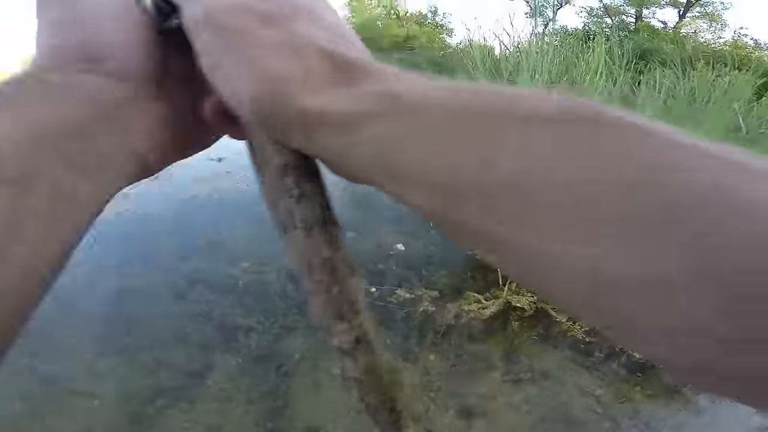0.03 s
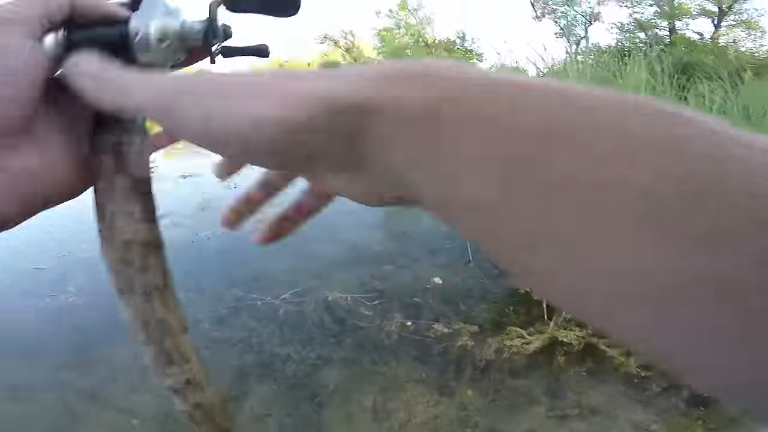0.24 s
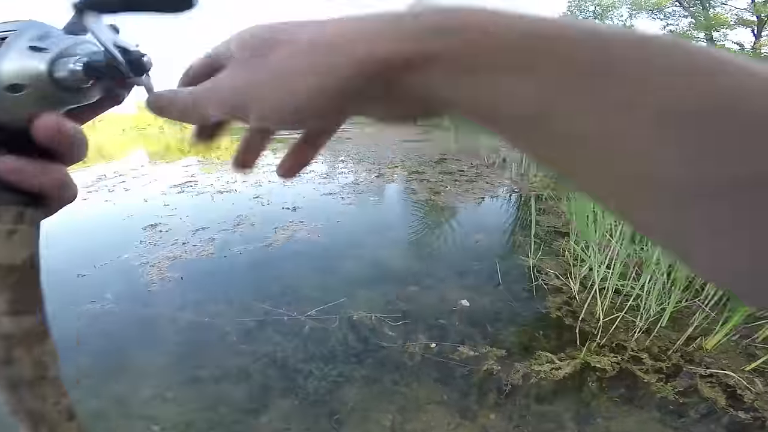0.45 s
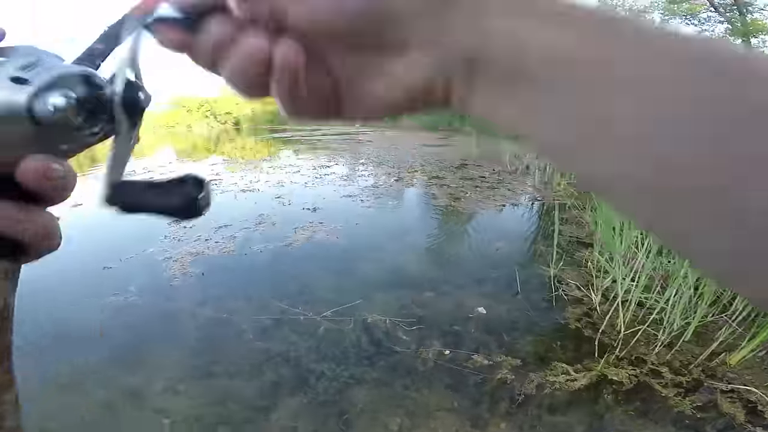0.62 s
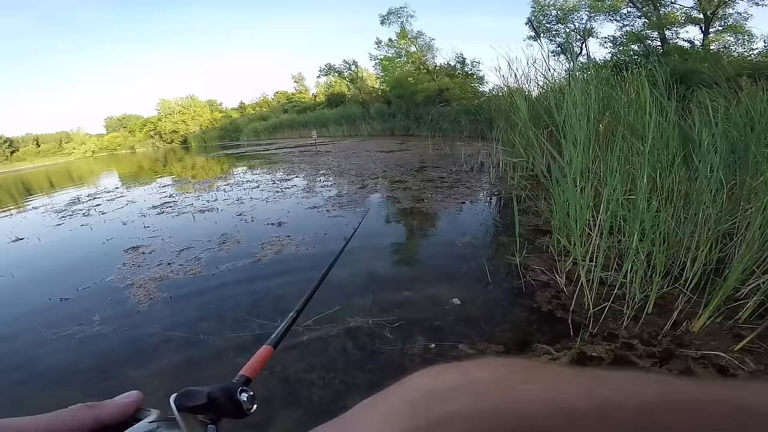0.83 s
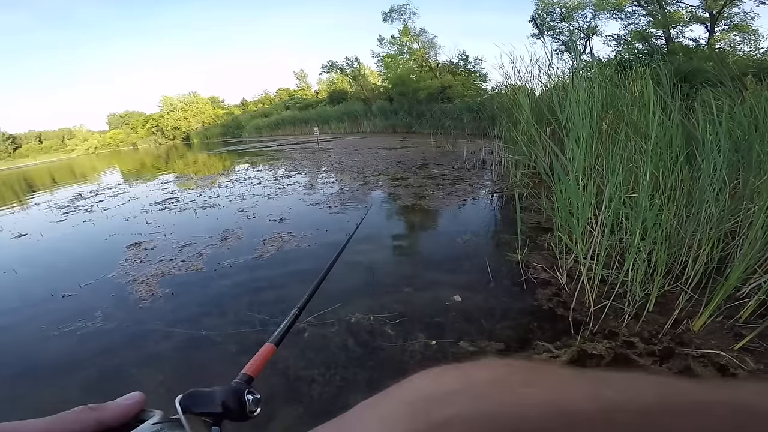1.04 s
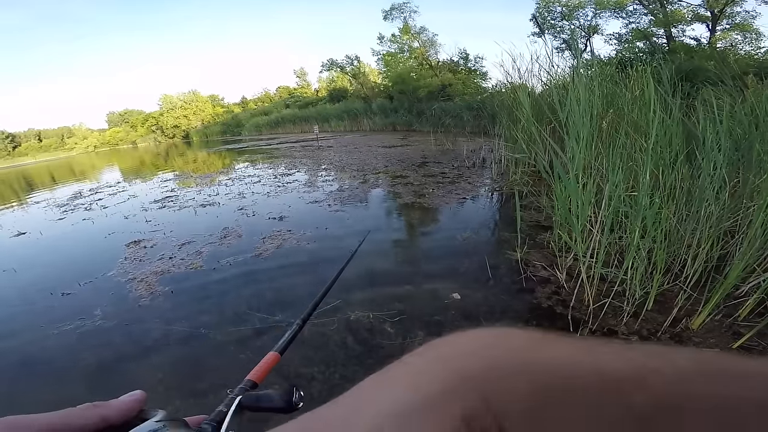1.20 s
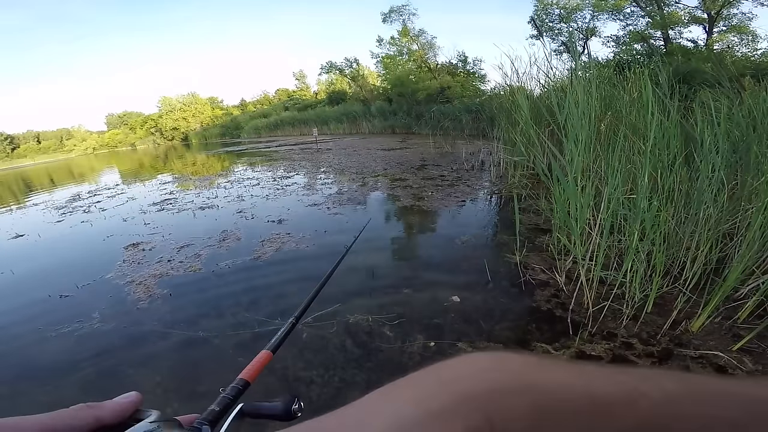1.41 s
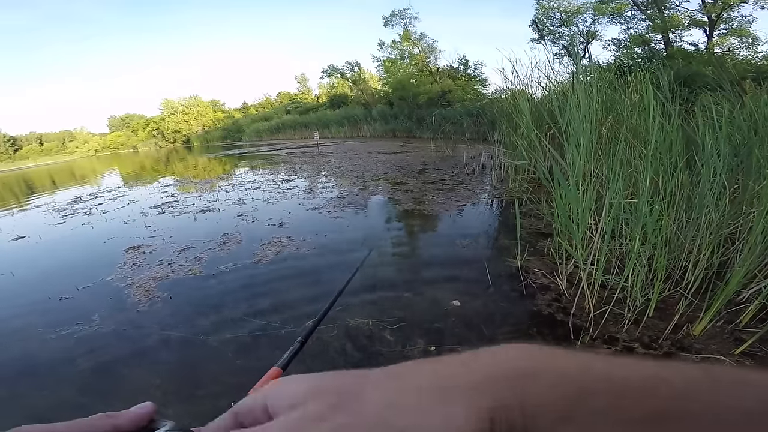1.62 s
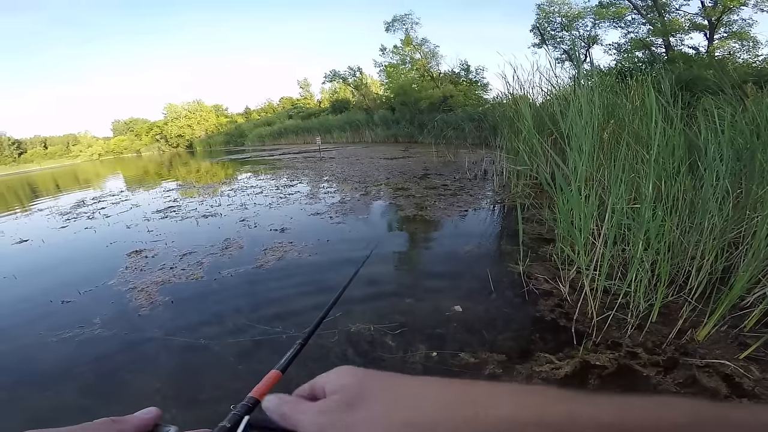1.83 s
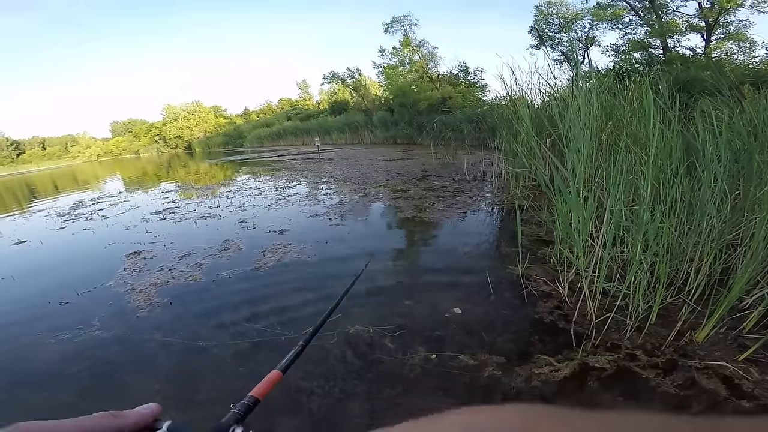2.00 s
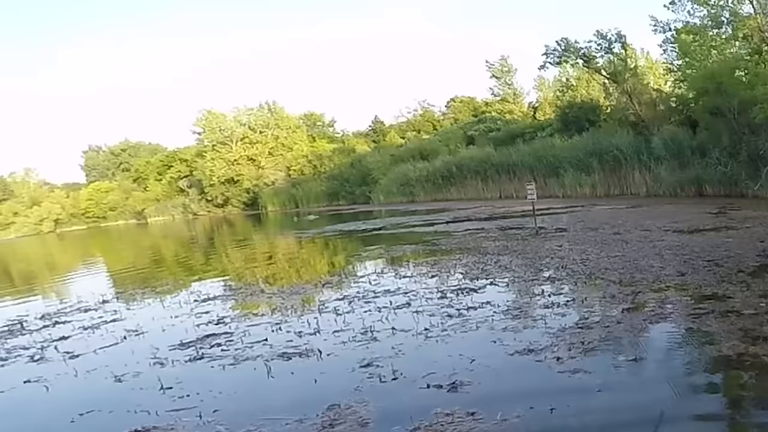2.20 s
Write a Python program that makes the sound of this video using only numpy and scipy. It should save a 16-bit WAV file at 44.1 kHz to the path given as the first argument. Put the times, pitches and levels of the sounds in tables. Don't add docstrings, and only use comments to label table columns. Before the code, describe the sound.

A fishing reel clutch snaps over with a loud metallic clack, then small ticks, beside a quiet pond

```python
import sys
import numpy as np
from scipy import signal
from scipy.fft import rfft, irfft, next_fast_len
from scipy.io import wavfile
from scipy.ndimage import uniform_filter1d, map_coordinates

SR = 44100
rng = np.random.default_rng(int(sys.argv[2]) if len(sys.argv) > 2 else 0)


def voltage_ratio(decibels):
    exponent = np.asarray(decibels, float) / 20
    return 10 ** exponent


def digitize_waveform(pressure):
    field = np.atleast_2d(pressure).T
    bounded = np.clip(field, -1, 1)
    quanta = np.round(bounded * 32767).astype(np.int16)
    wavfile.write(sys.argv[1], SR, quanta)


N = 99269


def unit(x):
    return x / np.sqrt(np.mean(x ** 2) + 1e-20)


def along(points, hz):
    f, v = np.transpose(points)
    return np.interp(np.log(hz + 1), np.log(f + 1), v, left=-120, right=-120)


def curves(rows):
    s, *cols = np.transpose(rows)
    return [np.interp(np.arange(N) / SR, s, c) for c in cols]


def wobble(rate):
    knots = rng.standard_normal(int(N * rate / SR) + 4)
    return map_coordinates(knots, [np.arange(N) * rate / SR])


def filtered(x, response):
    m = next_fast_len(x.shape[-1] + 8192)
    spectrum = rfft(x, m) * response(np.fft.rfftfreq(m, 1 / SR))
    return irfft(spectrum, m)[..., :x.shape[-1]]


def hump(x, centre_hz, width_hz):
    return filtered(x, lambda f: np.exp(-((f - centre_hz) / width_hz) ** 2))


def tone(hz):
    return np.sin(2 * np.pi * np.cumsum(hz) / SR)


def rush(spectrum, patchy_db):
    z = signal.stft(rng.standard_normal(N + 512), nperseg=512)[2]
    field = uniform_filter1d(rng.standard_normal(z.shape), 6, 0)
    field = uniform_filter1d(field, 10, 1)
    x = signal.istft(z * voltage_ratio(patchy_db * unit(field)), nperseg=512)[1][:N]
    return unit(filtered(x, lambda hz: voltage_ratio(along(spectrum, hz))))


def clicks(rows, q, broad):
    rise_share, broad_reach = 0.0437, 2.9
    out, t = np.zeros(N + SR), np.arange(SR // 8) / SR
    noise = rng.standard_normal((len(rows), len(t)))
    for (s, db, hz, t60), grit in zip(rows, noise):

        def body(f):
            ring = 1j * f * hz / q / (hz * hz - f * f + 1j * f * hz / q)
            crack = broad * f / (f + 250) / (1 + 1j * f / (broad_reach * hz)) ** 2
            return crack + ring ** 2

        burst = grit * voltage_ratio(-60 * t / t60) * (1 - np.exp(-t / (rise_share * t60)))
        burst = filtered(burst, body)
        energy = np.sum(burst ** 2) / (t60 * SR / 14)
        out[round(s * SR):][:len(t)] += voltage_ratio(db - 5.0) * burst / np.sqrt(energy)
    return out[:N]


def pings(rows):
    rise_share, rough_rad = .03, .55
    choke, cut = 1.556, 0.47
    out, t = np.zeros(N + SR), np.arange(SR // 8) / SR
    drift = uniform_filter1d(rng.standard_normal((len(rows), len(t))), size=40, axis=1)
    for (s, db, hz, t60), wander in zip(rows, drift):
        shape = voltage_ratio(db - 60 * (t / (cut * t60)) ** choke) * (1 - np.exp(-t / (rise_share * t60)))
        mode = np.sin(2 * np.pi * hz * t + rough_rad * unit(wander))
        out[round(s * SR):][:len(t)] += 1.324 * shape * mode
    return out[:N]


def far_traffic():
    # start_s, level_db
    swells = [(0, -1), (.3, 1), (.6, -0.5), (1, -1), (1.15, 1), (1.5, 1), (1.8, -1), (2.25, 0)]
    # pitch_hz, level_db (per Hz)
    colour = [(11, -26), (18, -8.5), (43, 0), (59, -1), (91, -9), (124, -7), (146, -13.5), (283, -25.5),
              (300, -26), (390, -59.5), (660, -120)]
    drone_db, drone_fade_s = 5, .5
    swell_db, = curves(swells)
    rumble = voltage_ratio(-42.5 + swell_db + .6 * wobble(3)) * rush(colour, patchy_db=0.67)
    drone = hump(rumble, centre_hz=193, width_hz=70)
    fade = np.exp(-(np.arange(N) / SR / drone_fade_s) ** 2)
    return rumble + (voltage_ratio(drone_db) - 1) * fade * drone


def reeds():
    # pitch_hz, level_db (per Hz)
    colour = [(150, -27), (250, -1), (455, -5), (796, -6), (1080, -7.5), (1230, -13.5), (3720, -16.5),
              (4150, -17.5), (6500, -24.5), (8450, -22), (14300, -120)]
    return voltage_ratio(-56 + 0.32 * wobble(3.8)) * rush(colour, patchy_db=.8)


def insect_chorus():
    # pitch_hz, level_db (per Hz)
    colour = [(3820, -8.5), (6500, -10), (8150, 1), (8730, 0), (9630, -16), (10600, -17), (11600, -19),
              (14800, -19.5), (15500, -20)]
    return voltage_ratio(-61 + 0.76 * wobble(7.955)) * rush(colour, patchy_db=1.0)


def crickets():
    # pitch_hz, width_hz, level_db
    singers = [
        (4180, 180, -75.5),
        (5600, 150, -74.5),
    ]
    far = np.zeros(N)
    for hz, width_hz, db in singers:
        far += voltage_ratio(db + wobble(4.7)) * unit(hump(rng.standard_normal(N), hz, width_hz))
    return far


def near_trill():
    # start_s, level_db
    loudness = [(0, -73), (.08, -68), (.14, -70), (.17, -65), (.3, -65.5), (.35, -68), (.5, -72),
                (.85, -69), (.95, -75), (1.1, -88)]
    chirps_per_s, first_s, duty = 40.2, .1615, .75
    level_db, = curves(loudness)
    cycle = (np.arange(N) / SR - first_s) * chirps_per_s % 1
    arch = np.sin(np.pi * np.clip(cycle / duty, 0, 1))
    hz = 8500 + 554 * arch + 90 * wobble(200)
    uneven_db = 3.5 * wobble(120) + 3 * wobble(500)
    return np.sqrt(np.abs(arch)) * tone(hz) * voltage_ratio(level_db + 7 + uneven_db)


def birds():
    # start_s, end_s, pitch_hz, level_db
    calls = [
        (0, .16, 5940, -74),
        (.16, .48, 6810, -74.5),
        (.85, 1.25, 7150, -74),
    ]
    t = np.arange(N) / SR
    out = np.zeros(N)
    for start_s, end_s, hz, db in calls:
        gate = np.clip(np.minimum(t - start_s + .01, end_s - t) / .03, 0, 1)
        out += gate * voltage_ratio(db + 0.5 + 2.7 * wobble(25)) * tone(hz + 12 * wobble(30.23))
    return out


def faint_rustles():
    # start_s, level_db (peak), pitch_hz (centre), t60_s
    rustles = [(0, -58, 12500, .12), (.028, -53, 12500, 0.077), (.147, -44, 3500, .012),
               (.154, -41, 9000, 0.012), (.169, -43, 7000, 0.01), (.19, -53, 13500, .12),
               (.262, -56.5, 12000, .06), (.36, -57, 11900, 0.031), (1.295, -53.5, 3000, 0.0202),
               (1.446, -56, 3020, .015), (1.563, -49, 2700, .02), (1.606, -52, 2600, .03),
               (2.117, -54, 13500, .02), (2.235, -55, 11060, 0.018)]
    return clicks(rustles, q=1.6, broad=0.075)


def clutch_slide():
    # start_s, level_db
    loudness = [(.484, -88.5), (.488, -49), (.502, -55.5), (.505, -33), (.52, -23), (.531, -26.5),
                (.54, -32.5), (.547, -39.5), (.56, -74.5)]
    # pitch_hz, level_db
    colour = [(200, -10.5), (700, -4), (1500, -7), (2500, 7), (5200, 2), (8000, -9), (14500, -14.5),
              (16000, -28.5)]
    slide_db, = curves(loudness)
    rasp = unit(voltage_ratio(1.83 * wobble(600)) * rush(colour, patchy_db=-1.5))
    return (np.arange(N) / SR < loudness[-1][0]) * voltage_ratio(slide_db) * rasp


def clutch_snap():
    # start_s, level_db (peak), pitch_hz (centre), t60_s
    contacts = [(.4875, -28, 3006, 0.0062), (.4932, -26, 9000, 0.006), (.4935, -25, 4800, .018),
                (.5036, -23.5, 5500, .012), (.5065, -15.5, 6000, 0.017), (.5108, -11, 6500, .007),
                (.5153, -7, 10500, .011), (.5186, 2, 10500, .009), (.5207, -6, 8000, .008),
                (.5236, -2, 9500, .008), (.5285, -14.5, 11800, 0.012), (.5385, -25, 6020, .022),
                (.533, -25, 9030, .012), (.5425, -27.5, 4800, 0.02), (.558, -45, 4800, 0.0184),
                (.578, -41, 3000, 0.02), (.59, -46.5, 4500, .015)]
    # start_s, level_db (peak), pitch_hz, t60_s
    modes = [(.5108, -17, 5100, .012), (.5153, -18, 12800, .014), (.5156, -13, 10190, .014),
             (.5156, -17, 5060, .014), (.5186, -6, 14470, .01), (.5187, -9, 12300, .012),
             (.5208, -13, 13350, .012), (.5188, -19, 2350, .02), (.5188, -6, 7520, .013),
             (.5188, -12, 4800, .016), (.5207, -12, 5360, .014), (.5236, -3, 12550, .013),
             (.5236, -4, 11410, .013), (.5237, -9, 10120, .012), (.524, -15, 2990, .012),
             (.5256, -16.5, 798, .018), (.5282, -25, 2020, 0.018), (.5375, -24, 5350, .03),
             (.558, -49, 4900, .025)]
    return clicks(contacts, q=1.2, broad=0.68) + pings(modes)


def hands_rub():
    # start_s, level_db
    loudness = [(.55, -48), (.6, -52), (.65, -53.5), (.72, -51.5), (.76, -53.5), (.88, -54), (.92, -83)]
    # pitch_hz, level_db
    colour = [(200, -25), (500, 6.5), (1500, -4), (2500, -1), (6000, -12), (10000, -19), (14500, -16.5),
              (16000, -28)]
    level_db, = curves(loudness)
    rub = unit(voltage_ratio(1.5 * wobble(200)) * rush(colour, patchy_db=-1))
    return (np.arange(N) / SR > .502) * voltage_ratio(level_db) * rub


def frame():
    # pitch_hz, level_db, t60_s
    modes = [(380, -16, .2), (456.6, -15, .08), (300, -9, .04), (550, 1, .05), (730, 3, .045),
             (1000, -1, .045), (885, -17, .13), (1078, -20, .14), (2200, 0, .045), (4943, 2, .035)]
    start_s, ring_db = .519, -17.5
    thud_hz, thud_db, thud_t60_s = 29, -28.5, 0.17
    out, t = np.zeros(N + SR), np.arange(SR // 2) / SR
    ring = np.zeros(len(t))
    for hz, db, t60 in modes:
        ring += voltage_ratio(db - 60 * t / t60) * np.sin(2 * np.pi * hz * t + rng.uniform(0, 6.4))
    ring *= voltage_ratio(ring_db) * (1 - np.exp(-t / 0.0035))
    thud = voltage_ratio(thud_db - 60 * t / thud_t60_s) * np.sin(2 * np.pi * thud_hz * t)
    out[round(start_s * SR):][:len(t)] += ring + thud
    return out[:N]


def reel_ticks():
    # start_s, level_db (peak), pitch_hz (centre), t60_s
    ticks = [(.646, -42, 3940, 0.0207), (.671, -53, 6000, 0.01866), (.6772, -17, 10100, 0.0058),
             (.6775, -28, 3920, .012), (.683, -39, 3000, 0.014), (.719, -47, 9000, 0.0115),
             (.722, -40, 1500, 0.043), (.7288, -27.5, 4000, 0.012), (.7373, -25.5, 6640, 0.0049),
             (.738, -27, 2190, 0.021), (.7415, -31.5, 3480, 0.021), (.748, -37, 2500, 0.038),
             (.76, -47, 5000, 0.012), (.769, -35, 5000, 0.015), (.792, -38, 10500, .01),
             (.7948, -33.5, 4430, 0.019), (.829, -40, 3670, 0.045), (.836, -44, 5000, 0.015),
             (.8392, -17.5, 11300, 0.0053), (.8392, -27, 4800, 0.0106), (.8675, -33.5, 3300, 0.0099),
             (.889, -41, 6940, 0.011), (.8925, -35, 3000, 0.016), (.935, -43, 2280, 0.011)]
    return clicks(ticks, q=2.34, broad=0.98)


def ticks_knocks_drips():
    # start_s, level_db (peak), pitch_hz, t60_s
    modes = [(.6772, -25, 8920, 0.011), (.6774, -29, 2910, 0.017), (.7286, -29.5, 3510, .015),
             (.7288, -32.5, 820, .015), (.733, -37, 3620, 0.017), (.7372, -31, 5400, .012),
             (.7372, -39, 2220, 0.016), (.7413, -35, 755, .03), (.779, -44, 2110, .03),
             (.786, -42, 1950, 0.049), (.792, -41, 4200, 0.022), (.7955, -35.5, 7880, 0.011),
             (.7955, -37, 2600, .012), (.7957, -36, 4700, .02), (.796, -36, 795, 0.063),
             (.8389, -31, 8910, 0.011), (.8389, -29, 12040, 0.01), (.8673, -41, 1160, 0.013),
             (.868, -39.5, 480, 0.052), (1.1042, -48, 5300, 0.013), (1.1045, -46.5, 1230, 0.018),
             (1.105, -42, 2220, .032), (1.345, -44.5, 738, 0.032), (1.435, -52, 980, 0.029),
             (1.567, -49, 950, 0.043), (1.605, -45.5, 980, 0.03), (1.608, -47.5, 710, .035),
             (1.668, -47, 1030, .04), (1.67, -49.5, 590, 0.027)]
    return pings(modes)


def guide_whistle():
    # start_s, pitch_hz, level_db
    glide = [(1.71, 12000, -84), (1.76, 11810, -83), (1.824, 14040, -81), (1.876, 13190, -83),
             (1.966, 13860, -80), (1.996, 13690, -81), (2.056, 12640, -82), (2.08, 11770, -80),
             (2.106, 10800, -85)]
    hz, level_db = curves(glide)
    t = np.arange(N) / SR
    on = (t > glide[0][0]) & (t < glide[-1][0])
    return on * voltage_ratio(level_db + 4 + 2 * wobble(60)) * tone(hz + 40 * wobble(80))


def scene():
    bank = far_traffic() + reeds() + insect_chorus() + crickets() + near_trill() + birds()
    reel = clutch_slide() + clutch_snap() + hands_rub() + frame() + reel_ticks()
    reel = filtered(reel, lambda f: 1 / (1 + (f / 15300) ** 16))
    mix = bank + faint_rustles() + reel + ticks_knocks_drips() + guide_whistle()
    return mix[None]


def band_limit(x):
    return signal.sosfilt(signal.butter(12, 15670, fs=SR, output="sos"), x)


def record(dry):
    limited = filtered(dry, lambda hz: 1 / (1 + (hz / 15450) ** 120))
    return band_limit(np.clip(limited, -1, 1))


dry = scene()
out = record(dry)
digitize_waveform(out)
```